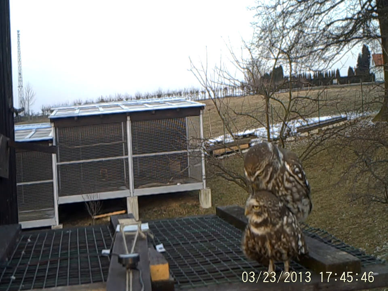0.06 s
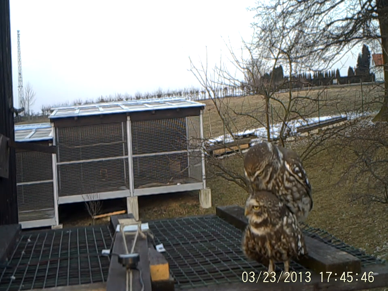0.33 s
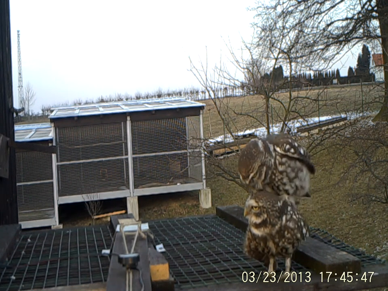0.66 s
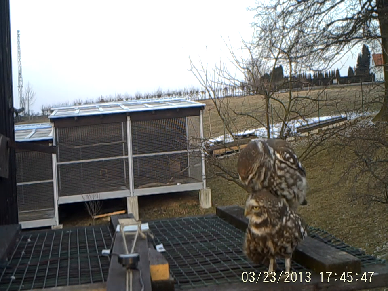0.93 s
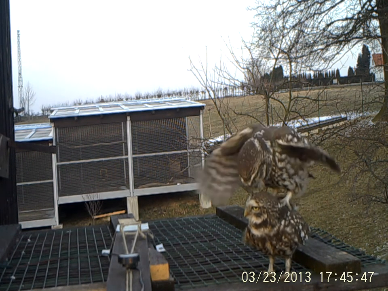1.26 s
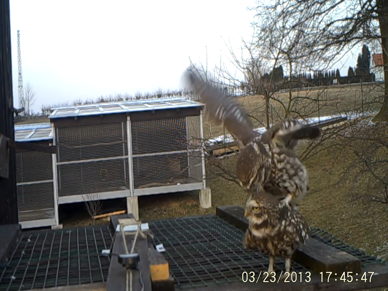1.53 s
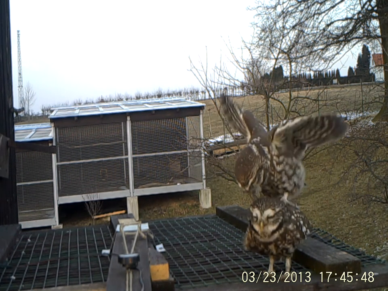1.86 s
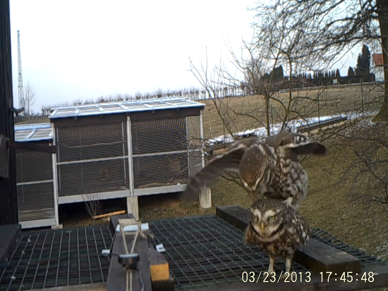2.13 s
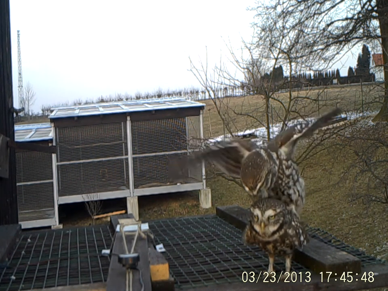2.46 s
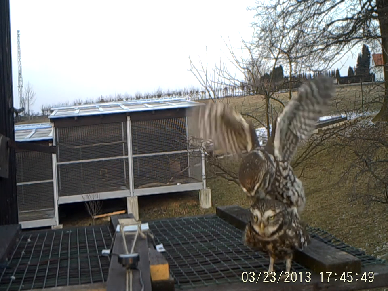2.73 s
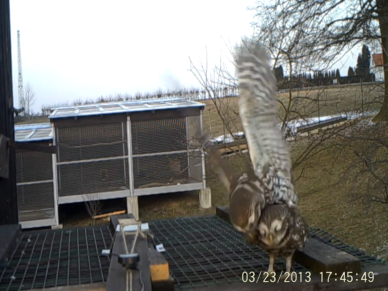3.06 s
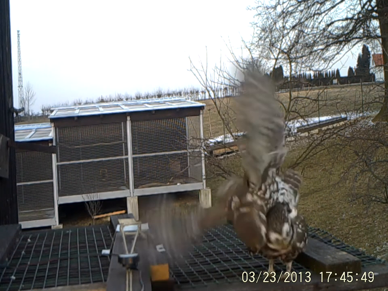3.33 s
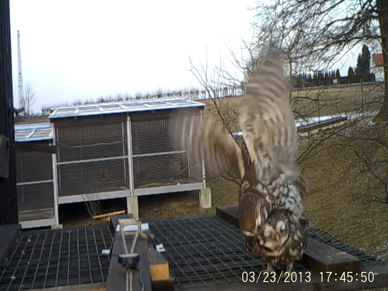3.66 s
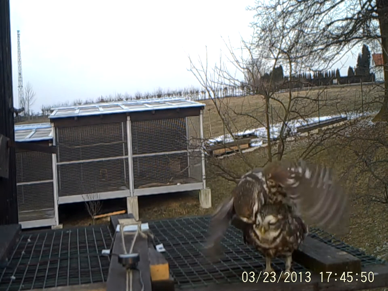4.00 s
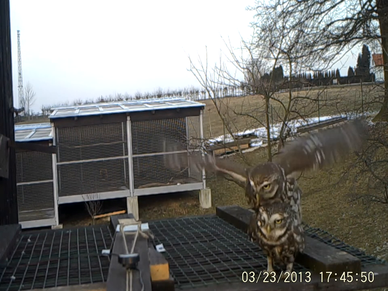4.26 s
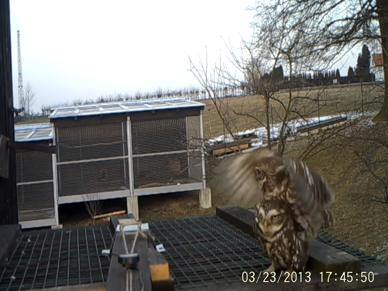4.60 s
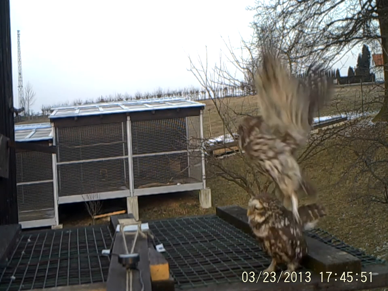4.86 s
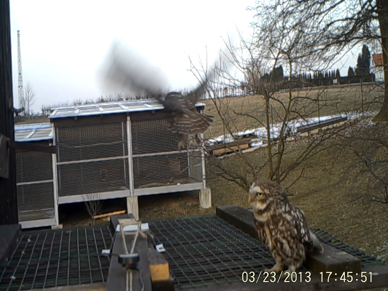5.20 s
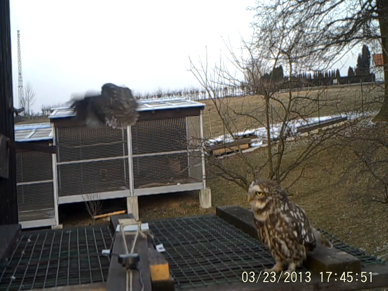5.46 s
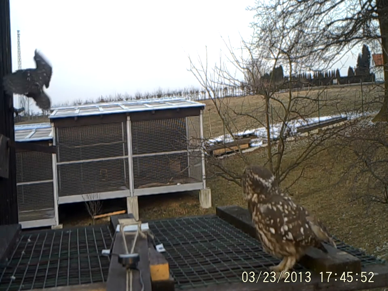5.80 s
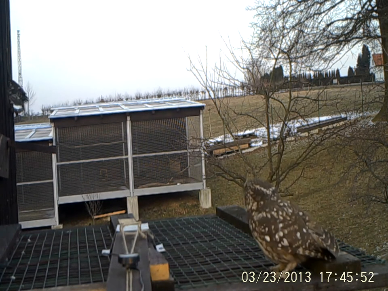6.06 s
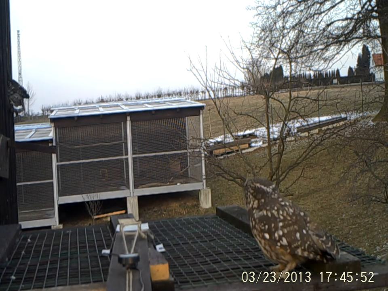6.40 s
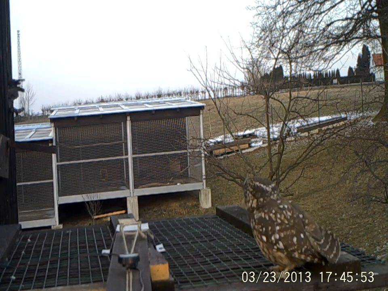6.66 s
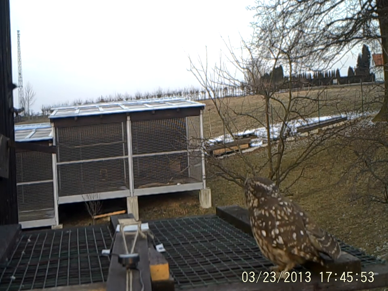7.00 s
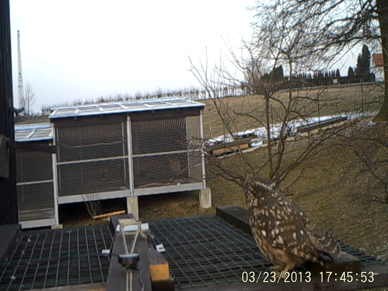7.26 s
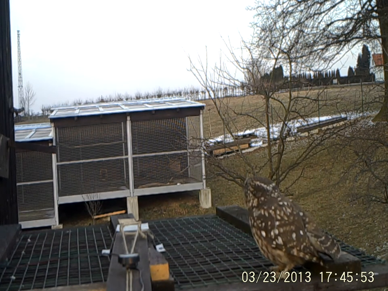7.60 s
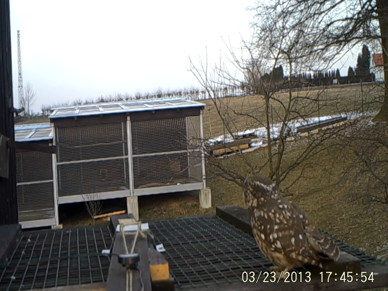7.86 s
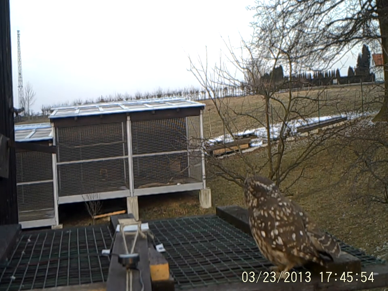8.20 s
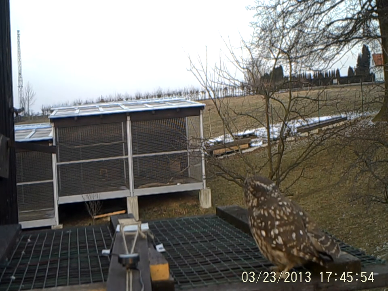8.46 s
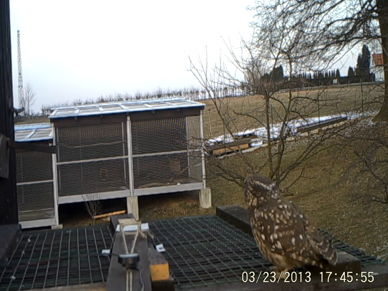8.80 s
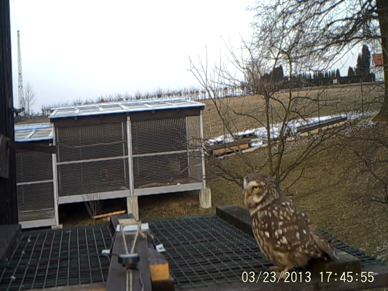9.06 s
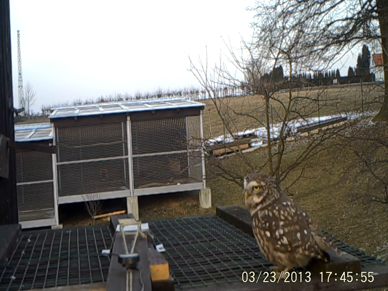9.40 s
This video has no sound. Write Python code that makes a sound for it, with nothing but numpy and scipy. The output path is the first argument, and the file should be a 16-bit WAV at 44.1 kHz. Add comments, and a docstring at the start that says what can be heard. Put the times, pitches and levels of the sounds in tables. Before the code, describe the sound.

Two little owls mate close to the microphone on an outdoor aviary roof, over a steady quiet hiss and faint low hum. For the first three seconds there are soft clucks, thin whines and a few short rasps, with rising and falling hoots at about 0.8, 1.6 and 2.5 seconds. From 3 to 3.8 seconds a loud, shrill squeal wavers up and down about eight times a second, along with gritty scuffs of feathers and claws and three soft, low wingbeats. Short rasps, clucks and a softer hoot follow, then a quick cluster of cracking hoots near 4.8 seconds. Four loud, arched yelps with a raspy break come at about 5.6, 6.6, 7.7 and 8.8 seconds, each echoing lightly off the nearby sheds. Small birds twitter in the distance around 5.3 seconds, and very faintly between and after the later yelps, until just past 9 seconds.

```python
"""Two little owls mate on the wire roof of an aviary, close by.
0-3 s: soft clucks, thin whines and arched hoots; each voice is syrinx harmonics shaped by the throat.
3-5 s: a wavering squeal with wing brushes, wingbeats and rasps, then more hoots and clucks.
5-9 s: four loud yelps ring among the enclosures; small birds twitter far off.
Throughout: quiet outdoor hiss and a faint hum."""
import sys
import numpy as np
from scipy import signal
from scipy.fft import rfft, irfft, next_fast_len
from scipy.io import wavfile
from scipy.ndimage import uniform_filter1d, minimum_filter1d, map_coordinates

SR = 44100
rng = np.random.default_rng(int(sys.argv[2]) if len(sys.argv) > 2 else 0)


def bounce(signal):
    """Save signal as a 16-bit WAV file at the path given by the first command-line argument."""
    frames = np.transpose(np.atleast_2d(signal))
    limited = np.clip(frames, -1, 1)
    pcm = np.round(limited * 32767).astype(np.int16)
    wavfile.write(sys.argv[1], SR, pcm)


N = 415863

# Voice levels and overtone slopes are ahead of the tone-colour gain.
# (crest [s], rise [s], fall [s], top pitch [Hz], level [dB], rasp level [dB])
YELPS = [(5.624, 0.12, 0.14, 1545, -23, -56), (6.587, 0.13, 0.15272, 1623, -22, -51.5),
         (7.717, .12, 0.1686, 1619, -22, -52), (8.778, 0.13, 0.1574, 1624, -22.5, -53)]
# (place [-1 start, 0 crest, 1 end], pitch [x top], tone gain [dB], rasp gain [dB])
YELP_SHAPE = [(-1, 0.28, -32.5, -25.5), (-.85, 0.38, -25.5, -18.5), (-0.65, .58, -15, -5.5),
              (-.46, .72, -10.5, 1.5), (-.23, .91, -0.5, 3), (-.11, 0.99158, -0.5, 6),
              (.1, 0.98972, -2, -0.5), (0.2305, .895, -9, -3), (.39, .73, -12, 1), (.54, .665, -9, 0),
              (0.63, .585, -12, -8), (0.9998, .32, -26, -32.5)]
# (crest [s], top pitch [Hz], level [dB], slope [dB/oct], next dip [s], dip pitch [Hz], dip level [dB])
SQUEAL_SWINGS = [(3.108, 5520, -40, 9, 3.131, 4850, -44.5), (3.178, 6460, -21.5, -2, 3.243, 5439, -32.5),
                 (3.305, 6160, -19.5, -2.5, 3.364, 4888, -32), (3.426, 5960, -20.5, 4, 3.484, 4690, -39.5),
                 (3.543, 5695, -21.5, -5, 3.604, 4430, -45), (3.659, 5742, -22, -0.5, 3.74, 3699, -49),
                 (3.784, 5260, -44, -9, 3.836, 3650, -47)]
# register snaps: (time [s], pitch jump [ratio], level jump [dB])
SQUEAL_BREAKS = [(3.1, 0.19, 14), (3.331, 0.00762, -15), (3.552, -0.06463, -8)]
# (crest [s], lead-in [s], rise [s], fall [s], top pitch [Hz], level [dB], roughness [-],
#  slope drop per octave of pitch rise [dB/oct])
HOOTS = [(.768, .038, 0.15, 0.12182, 1047, -33.5, 0.04, 26),
         (1.632, 0.005, 0.13116, 0.14807, 1059, -33.5, 0.09, 29),
         (2.53, 0.0616, 0.17115, 0.13, 1053, -30.5, 0.03, 24),
         (3.912, 0.039, 0.12, 0.077, 809, -39, 0, -7.5), (4.787, .03, .125, .11, 1010, -31, 0.14, 4.5),
         (4.815, 0.033, 0.07, 0.089, 1052, -31, 0.14, 14),
         (4.905, 0.0051, 0.0345, 0.05018, 877.1, -33, 0.12, 20)]
# (start [s], end [s], pitch [Hz], level [dB], roughness [-])
CRACKS = [(1.613, 1.654, 986, -44.5, 0.38), (4.769, 4.805, 1015, -26.5, 0)]
# (time [s], base pitch [Hz], level [dB], roughness [-])
CLUCKS = [(.175, 853, -47, 0.73), (.31, 892, -47, 1.1), (.403, 794.6, -44.5, 0.1), (.487, 824, -44.5, 0.04),
          (1.092, 885, -43, 0.57), (1.209, 830, -45.5, 0.48), (1.31, 728, -45, 0.2),
          (1.403, 700, -47, 0.18), (1.98, 890.7, -43, 0.51), (2.098, 868, -43, 0.41),
          (2.208, 726, -42.5, 0.11), (2.846, 920, -39, 0.69), (2.978, 933.3, -35, 0.51),
          (4.373, 1015, -43.5, 1.16), (4.423, 892, -48.5, 1.48), (4.563, 919, -37.5, 0.61)]
# (place [x CLUCK_S], low voice [x base pitch], high voice [x base pitch], low gain [dB], high gain [dB])
CLUCK_SHAPE = [(-.1, .8, 1.25, -4.5, -4.5), (.3, 0.992, 1.8, -1, 4.5), (.7, .83, 1.15, -1, 6),
               (1.05, 0.58, 0.606, -8.5, -3.5)]
# (start [s], end [s], first pitch [Hz], last pitch [Hz], level [dB], slope [dB/oct])
WHINES = [(0.056, 0.308, 1723, 1760, -53.5, -22.5), (0.692, 1.082, 1866, 1973, -52.5, -30),
          (1.996, 2.104, 1993, 1510, -53.5, -24.5), (2.662, 2.847, 1937, 1998, -55, -7),
          (3.072, 3.102, 2343, 2492, -48, 4), (4.018, 4.053, 3150, 2490, -53.5, -2.5),
          (4.052, 4.102, 2690, 2550, -49.5, -3)]
# (start [s], length [s], level [dB], centre [Hz])
RASPS = [(1.43, 0.0279, -45, 1743), (1.502, 0.044, -46.5, 1801), (1.732, 0.04242, -44, 1586),
         (1.811, 0.12, -47.5, 1543), (3.755, 0.0519, -42.5, 1670), (4.091, 0.0862, -43, 4210),
         (4.106, 0.094, -45.5, 1550), (4.167, 0.029, -41.5, 2240), (4.349, 0.0251, -45.5, 2240),
         (4.853, 0.033, -37.5, 1560), (6.982, 0.028, -49, 2600), (9.261, 0.04158, -50.5, 3458)]
# (start [s], base level [dB], T60 [s])
BRUSHES = [(3.132, -37.5, 0.05424), (3.244, -32.5, 0.06), (3.36, -26.5, 0.02491), (3.377, -32.5, 0.04447),
           (3.489, -22.5, 0.0188), (3.552, -28, 0.0042), (4.59, -39, 0.095)]
# (centre [s], level [dB])
WINGBEATS = [(3.27, -41.5), (3.384, -44.5), (3.514, -45)]
# (start [s], length [s], first pitch [Hz], middle pitch [Hz], last pitch [Hz], middle level [dB])
TWITTERS = [(5.247, 0.01833, 1230, 1964, 1730, -49), (5.353, 0.11005, 2337, 3440, 3070, -45.5),
            (7.26, 0.3393, 3230, 3800, 4680, -63.5), (8.523, 0.22, 3580, 4144, 4600, -61.5),
            (9.191, 0.074, 4320, 4535, 4164, -61)]
# yelp tone colour, throat resonances plus notches from nearby reflections: (frequency [Hz], gain [dB])
YELP_COLOUR = [(1400, 2), (1700, -4), (2120, 7), (2450, 1), (2950, 7.5), (3270, 5.5), (3550, -7.5),
               (4050, 0.5), (4800, 9), (6100, -10), (6450, 1), (7300, -16), (16000, -32)]
# tone colour of the other voices: (frequency [Hz], gain [dB])
YELP_RASP_COLOUR = [(2500, -10), (3900, 7), (6000, 1.5), (7800, -2.5), (12300, -2.5), (16000, -8.5)]
SQUEAL_COLOUR = [(3000, -2.5), (6200, 0), (8500, -7.5), (11800, -2.5), (14000, -9.5), (16000, -12.5)]
HOOT_COLOUR = [(1000, -0.5), (1650, -3), (2100, -10), (2600, -7), (3300, -26.5), (4300, -23), (5300, -19),
               (7500, -35.5), (12000, -25), (16000, -36)]
CRACK_COLOUR = [(1000, -2), (2050, 2), (3050, -13.5), (4100, -20.5), (5100, -23), (6500, -32.5),
                (9500, -25.5), (16000, -38)]
# treble beamed at the sheds by the yelping owl: (frequency [Hz], gain [dB])
YELP_BEAM = [(1700, -7), (2800, -1), (3200, -4.5), (3800, 4), (4700, -3), (6800, 6)]
# off walls and sheds: (delay [s], gain [dB])
ECHOES = [(0.178, -29), (.204, -34.5)]
# outdoor hiss: (frequency [Hz], relative density [dB])
AIR_SPECTRUM = [(10, -12), (30, -1.5), (70, -0.5), (150, -2), (400, -7), (2000, -15), (6000, -21.5),
                (15500, -26)]

YELP_SLOPE_DB_OCT, YELP_MELLOWING_DB_OCT_PER_S = -6, 30
YELP_PRESS_DB_OCT, YELP_PRESS_AT_S, YELP_PRESS_WIDTH_S = 6, .03, .014  # pressed, brighter onset
YELP_BREAK_LEAD_S, YELP_BREAK_WIDTH_S = .028, .02
SQUEAL_START_S, SQUEAL_START_HZ, SQUEAL_START_DB = 3.054, 2600, -43.5
SQUEAL_WAVER_RATIO, SQUEAL_WAVER_DB, SQUEAL_WAVER_PER_S = .009263, 2, 110
SQUEAL_DIP_SLOPE_DB_OCT, SQUEAL_FLARE_LEAD_S = -18.5, .0047
UNDERTONE_DB, UNDERTONE_DB_PER_S = -58.5, 39
HOOT_LEAD_HZ, HOOT_LEAD_DB, HOOT_FOOT_HZ, HOOT_FOOT_DB = 700, -45.5, 596, -52
HOOT_WAVER_RATIO, HOOT_WAVER_DB, HOOT_WAVER_PER_S = .026, 1.8, 45
HOOT_STEP_RATIO, HOOT_STEP_LEAD_S = .1, .045
CLUCK_S, WINGBEAT_S, JOLT_S = .045, .07, .016
CRACK_EDGE_S, CRACK_EDGE_DB = .008, 18
YARD_T60_S, YARD_DB, PERCH_ECHO_S, PERCH_ECHO_DB = .62, -14.5, .013, -14
FACING_SEND_DB = -4  # calls towards the microphone excite the yard less than the yelps
AIR_DB, HUM_HZ, HUM_DB = -52, 50, -59.5
LIMIT_DB, LIMIT_S, CUTOFF_HZ = -2.9, .004, 15600


def yelps():
    """Loud arched cries; the voice breaks into a rasp just before the crest, then clears and mellows."""
    out = np.zeros(N)
    place, pitch_ratio, swell_db, strain_db = np.transpose(YELP_SHAPE)
    for crest, rise, fall, top_hz, db, rasp_db in YELPS:
        s = crest + place * np.where(place < 0, rise, fall)
        hz = top_hz * pitch_ratio
        slope = YELP_SLOPE_DB_OCT - YELP_MELLOWING_DB_OCT_PER_S * np.maximum(s - crest, 0)
        slope += YELP_PRESS_DB_OCT * bump(s, s[0] + YELP_PRESS_AT_S, YELP_PRESS_WIDTH_S)
        breaking = bump(s, crest - YELP_BREAK_LEAD_S, YELP_BREAK_WIDTH_S)
        tone_rough, rasp_rough = .045 + .3 * breaking, .6 + 1.3 * breaking
        out += voice(np.c_[s, hz, db + swell_db, slope, tone_rough], YELP_COLOUR, harmonics=4,
                     jitter=.0411, flutter=.3, doubling=.5, breath_db=1.5, second_db=13.5,
                     flicker_db=1.53)
        out += voice(np.c_[s, hz, rasp_db + strain_db, np.zeros(len(s)), rasp_rough], YELP_RASP_COLOUR,
                     harmonics=16, jitter=.011, flutter=.5, doubling=.35, breath_db=5)
    return out


def squeal():
    """Shrill whistle, about 8 swings/s, louder and brighter on the crests; snaps between registers."""
    crest, top_hz, top_db, top_slope, dip, dip_hz, dip_db = np.transpose(SQUEAL_SWINGS)
    turns = np.r_[SQUEAL_START_S, np.c_[crest, dip].ravel()]
    s = np.linspace(turns[0], turns[-1], 800)
    lift = np.sin(np.pi / 2 * np.interp(s, turns, np.arange(len(turns)))) ** 2  # 0 dip, 1 crest
    swing = np.searchsorted(dip[:-1], s)
    low_hz = np.interp(s, turns[::2], np.r_[SQUEAL_START_HZ, dip_hz])
    low_db = np.interp(s, turns[::2], np.r_[SQUEAL_START_DB, dip_db])
    hz = low_hz + (top_hz[swing] - low_hz) * lift ** .82
    hz *= 1 + SQUEAL_WAVER_RATIO * waver(s, SQUEAL_WAVER_PER_S)
    db = low_db + (top_db[swing] - low_db) * lift ** .8
    db += SQUEAL_WAVER_DB * waver(s, SQUEAL_WAVER_PER_S)
    for when, jump_ratio, jump_db in SQUEAL_BREAKS:
        hz *= 1 + jump_ratio * jolt(s, when)
        db += jump_db * jolt(s, when)
    flare = np.interp(s + SQUEAL_FLARE_LEAD_S, s, lift) ** 2
    slope = SQUEAL_DIP_SLOPE_DB_OCT + (top_slope[swing] - SQUEAL_DIP_SLOPE_DB_OCT) * flare
    rough = np.full(len(s), .07)
    # reedy undertone at half pitch, growing towards the last crest
    reed_db = UNDERTONE_DB - UNDERTONE_DB_PER_S * abs(s - crest[-1])
    reed_slope = np.full(len(s), 2.5)
    reed = voice(np.c_[s, hz / 2, reed_db, reed_slope, rough], SQUEAL_COLOUR, harmonics=5)
    return reed + voice(np.c_[s, hz, db, slope, rough], SQUEAL_COLOUR, harmonics=2)


def hoots():
    """Arched notes, louder and mostly purer as they rise; the pitch steps up just before the crest."""
    out = np.zeros(N)
    for crest, lead, rise, fall, top_hz, top_db, rough, mellowing in HOOTS:
        s, drop = arch(crest, rise, fall, rounding=.22)
        hz = top_hz + (HOOT_FOOT_HZ - top_hz) * drop
        hz *= 1 + HOOT_WAVER_RATIO * (1 - drop) * waver(s, HOOT_WAVER_PER_S)
        hz *= 1 + HOOT_STEP_RATIO * jolt(s, crest - HOOT_STEP_LEAD_S)
        db = top_db + (HOOT_FOOT_DB - top_db) * drop ** 1.74
        db += HOOT_WAVER_DB * (1 - drop) * waver(s, HOOT_WAVER_PER_S)
        # lead-in: soft slide down onto the foot
        s, hz, db = np.r_[s[0] - lead, s], np.r_[HOOT_LEAD_HZ, hz], np.r_[HOOT_LEAD_DB, db]
        slope = -3 - mellowing * np.log2(hz / HOOT_FOOT_HZ)
        out += voice(np.c_[s, hz, db, slope, np.full(len(s), rough)], HOOT_COLOUR, harmonics=16,
                     jitter=.0831, flutter=1, doubling=.1202, breath_db=-4, second_db=5)
    return out


def cracks():
    """A hoot cracks at its crest into a short level tone with a strong second harmonic."""
    out = np.zeros(N)
    for start, end, hz, db, rough in CRACKS:
        rows = [(start - CRACK_EDGE_S, hz * .89, db - CRACK_EDGE_DB, 0, rough),
                (start + CRACK_EDGE_S, hz, db, 0, rough),
                (end - CRACK_EDGE_S, hz, db, 0, rough),
                (end + CRACK_EDGE_S, hz * .97, db - CRACK_EDGE_DB, 0, rough)]
        out += voice(rows, CRACK_COLOUR, harmonics=15, jitter=.04794, doubling=.2, breath_db=1)
    return out


def clucks():
    """Tiny arches; in hoarse ones the other side of the syrinx takes over with a steep chirp."""
    out = np.zeros(N)
    for start, hz, db, rough in CLUCKS:
        low_side, high_side = [], []
        for place, low_ratio, high_ratio, low_db, high_db in CLUCK_SHAPE:
            s = start + place * CLUCK_S
            low_side.append((s, hz * low_ratio, db + low_db - 7 * rough, -9 + 5 * rough, .1))
            high_side.append((s, hz * high_ratio, db + high_db, -14, rough))
        out += voice(low_side, HOOT_COLOUR, harmonics=3,
                     jitter=.06, flutter=.7, doubling=.32, breath_db=-8, second_db=6)
        out += rough * voice(high_side, HOOT_COLOUR, harmonics=2,
                             jitter=.03, flutter=.3, doubling=.065, breath_db=-11)
    return out


def whines():
    """Thin begging notes, held or gliding."""
    out = np.zeros(N)
    for start, end, first_hz, last_hz, db, slope in WHINES:
        rows = [(start, first_hz, db, slope, .2), (end, last_hz, db, slope, .2)]
        out += voice(rows, SQUEAL_COLOUR, harmonics=5, jitter=.0986)
    return out


def voice(rows, timbre, harmonics, jitter=.065, flutter=.68, doubling=.04, breath_db=-19,
          second_db=0, flicker_db=1.8258):
    """Coloured syrinx tone. Rows: (time [s], pitch [Hz], level [dB], slope [dB/oct], roughness [-])."""
    s, *columns = np.transpose(rows)
    t = np.arange(s[0], s[-1], 1 / SR)
    n = len(t)
    hz, db, slope, rough = [uniform_filter1d(np.interp(t, s, column), size=220, mode="nearest")
                            for column in columns]
    # a rough membrane wanders in pitch, flutters and beats strong-weak
    wander = 1 + jitter * rough * drift(500, n) + .0069222 * drift(59.599, n)
    phase = 2 * np.pi * np.cumsum(hz * wander) / SR
    tone = np.zeros(n)
    for k in range(1, harmonics + 1):
        gain = from_db(at_hz(timbre, k * hz) + slope * np.log2(k) + second_db * (k == 2))
        flicker = from_db(flicker_db * np.log2(k) * drift(70, n))
        tone += np.sqrt(2) * gain * flicker * (k * hz < CUTOFF_HZ) * np.sin(k * phase)
    tone *= 1 + rough * (flutter * drift(900, n) + doubling * np.cos(phase / 2))
    breath = rough * from_db(breath_db) * noise([(400, -21)] + timbre[1:], n)
    out = np.zeros(N)
    add(out, s[0], (tone + breath) * from_db(db) * fade(n, edge_s=.00095))
    return out


def rasps():
    """Voiceless harsh notes: broad noise round one throat resonance."""
    out = np.zeros(N)
    for start, length, db, hz in RASPS:
        n = round(length * SR)
        band = noise([(hz * .27, -32), (hz * .61, -5), (hz, 0), (hz * 1.45, -8),
                      (hz * 1.766, -21), (16000, -31)], n)
        flutter_db = 1.45 * drift(275, n)
        add(out, start, from_db(db + flutter_db) * band * fade(n, edge_s=.009))
    return out


def brushes():
    """Feathers and claws scuff the perch in short gritty bursts."""
    out, n = np.zeros(N), SR // 8
    for start, db, t60_s in BRUSHES:
        scuff = noise([(50, 5), (160, 5), (450, -6.5), (1500, 8.5), (3000, 2), (7000, -5),
                       (15000, -7.5)], n)
        decay_db = -60 * np.arange(n) / SR / t60_s
        grit_db = 3.5 * drift(690, n)
        add(out, start, scuff * from_db(db - 2 + decay_db + grit_db))
    return out


def wingbeats():
    """Flapping wings push low puffs of air at the microphone."""
    out, n = np.zeros(N), round(WINGBEAT_S * SR)
    for centre, db in WINGBEATS:
        puff = noise([(40, -7.5), (160, -3), (400, -20.5), (2000, -29.5)], n)
        add(out, centre - WINGBEAT_S / 2, from_db(db) * puff * fade(n, WINGBEAT_S / 2))
    return out


def twitters():
    """Faint whistled glides of distant small birds."""
    out = np.zeros(N)
    for start, length, first_hz, middle_hz, last_hz, db in TWITTERS:
        rows = [(start, first_hz, db - 4, -20, .25),
                (start + length / 2, middle_hz, db, -20, .25),
                (start + length, last_hz, db + 4, -20, .25)]
        out += voice(rows, SQUEAL_COLOUR, harmonics=1)
    return out


def yard(x):
    """Two distinct echoes and a thin, dull tail from sheds and trees."""
    t = np.arange(SR) / SR
    response = noise([(300, -5.5), (1500, -7.5), (3200, -2), (4400, -3), (6000, -12.5), (15000, -16)], SR)
    early, tail = 4.1 * from_db(-60 * t / .068), from_db(-60 * t / YARD_T60_S)
    response *= (early + tail) * fade(SR, edge_s=.0057)
    response *= from_db(YARD_DB) / np.sqrt(np.sum(response ** 2))
    for delay, db in ECHOES:
        add(response, delay, [from_db(db)])
    return signal.fftconvolve(x, response)[:N]


def background():
    """Outdoor hiss and faint electrical hum."""
    hum = np.sqrt(2) * np.sin(2 * np.pi * HUM_HZ * np.arange(N) / SR)
    return from_db(AIR_DB) * noise(AIR_SPECTRUM, N) + from_db(HUM_DB) * hum


def arch(crest, rise, fall, rounding):
    """Rounded peak: times [s] and drop (0 at the crest, 1 at the feet)."""
    place = np.linspace(-1, 1, 81)
    drop = (place ** 4 + rounding ** 4) ** .25 - rounding
    return crest + place * np.where(place < 0, rise, fall), np.clip(drop / drop[0], 0, 1)


def bump(s, centre, width):
    """Bell of height 1."""
    return np.exp(-((s - centre) / width) ** 2)


def jolt(s, when):
    """Sag to -1/2, jump to +1/2, relax to 0."""
    return np.sign(s - when) * np.exp(-abs(s - when) / JOLT_S) / 2


def fade(size, edge_s):
    """Gate with soft ends."""
    i = np.arange(size)
    return np.sin(np.pi / 2 * np.clip(np.minimum(i, i[::-1]) / (edge_s * SR), 0, 1)) ** 2


def drift(rate_per_s, size):
    """Smooth random curve, spread about 1."""
    steps = np.arange(size) * rate_per_s / SR
    return map_coordinates(rng.standard_normal(4096), [steps], order=3, mode="wrap")


def waver(s, rate_per_s):
    """Drift read at times s."""
    return drift(rate_per_s, SR)[((s - s[0]) * SR).astype(int)]


def noise(spectrum, size):
    """Coloured noise, RMS 1."""
    x = colour(rng.standard_normal(size), spectrum)
    return x / np.sqrt(np.mean(x ** 2) + 1e-20)


def colour(x, spectrum):
    """Filter by (frequency [Hz], gain [dB]) points."""
    size = next_fast_len(len(x))
    gain = from_db(at_hz(spectrum, np.fft.rfftfreq(size, 1 / SR)))
    return irfft(rfft(x, size) * gain, size)[:len(x)]


def at_hz(spectrum, hz):
    """Gain [dB], interpolated over log frequency."""
    points_hz, db = np.transpose(spectrum)
    return np.interp(np.log(np.maximum(hz, 1)), np.log(points_hz), db)


def from_db(db):
    """Decibels to gain."""
    return 10 ** (np.asarray(db) / 20)


def add(out, start_s, x):
    """Mix x into out."""
    i = max(0, round(start_s * SR))
    out[i:i + len(x)] += x[:max(0, N - i)]


def scene():
    """Owls and far birds with yard and perch reflections, over the background."""
    facing = hoots() + cracks() + clucks() + whines() + squeal() + rasps() + brushes() + twitters()
    away = yelps()
    send = from_db(FACING_SEND_DB) * facing
    out = facing + away + yard(send + colour(away, YELP_BEAM)) + wingbeats() + background()
    add(out, PERCH_ECHO_S, from_db(PERCH_ECHO_DB) * (send + away))
    return out[None]


def record(dry):
    """Fast peak limiter, then a steep low-pass."""
    size = round(LIMIT_S * SR)
    gain = 1 / np.maximum(1, abs(dry) / from_db(LIMIT_DB))
    gain = uniform_filter1d(minimum_filter1d(gain, size), size)
    lowpass = signal.ellip(12, .1, 80, CUTOFF_HZ, fs=SR, output="sos")
    return signal.sosfilt(lowpass, dry * gain)


dry = scene()
out = record(dry)
bounce(out)
```